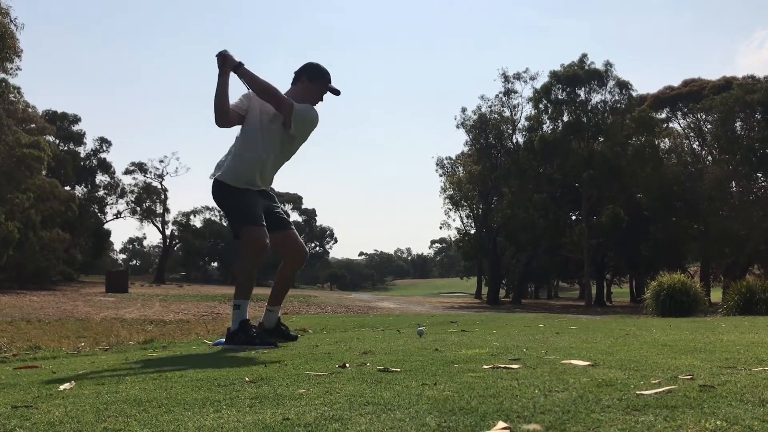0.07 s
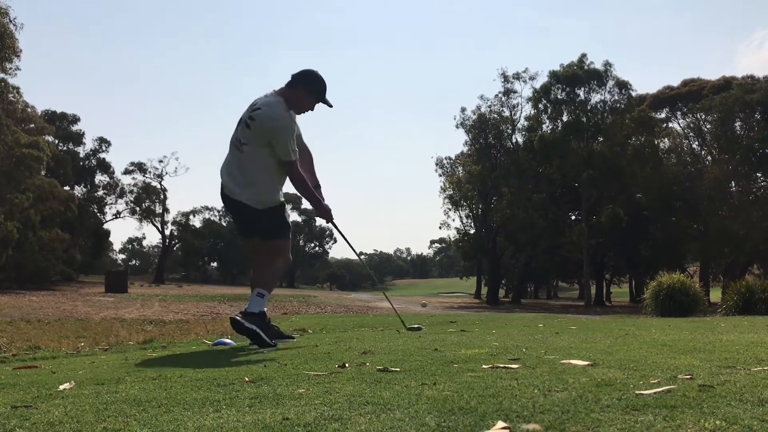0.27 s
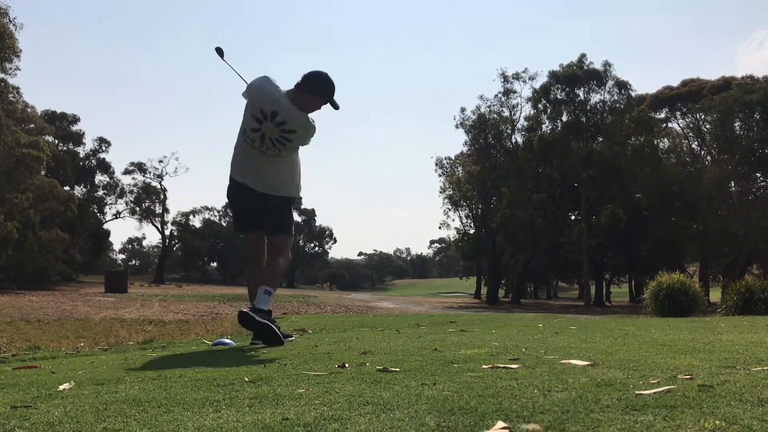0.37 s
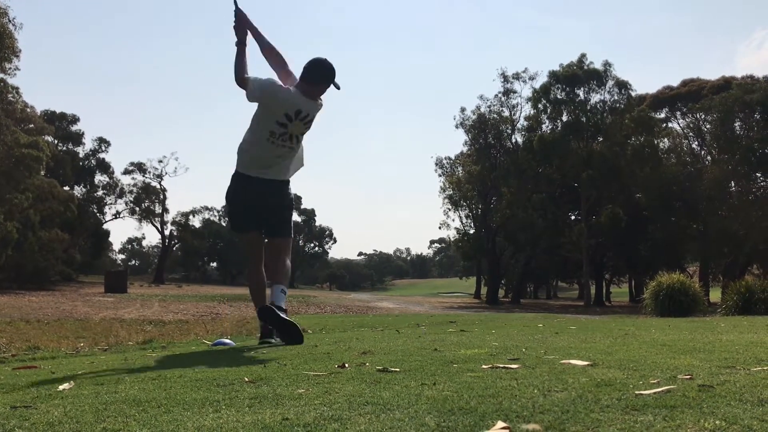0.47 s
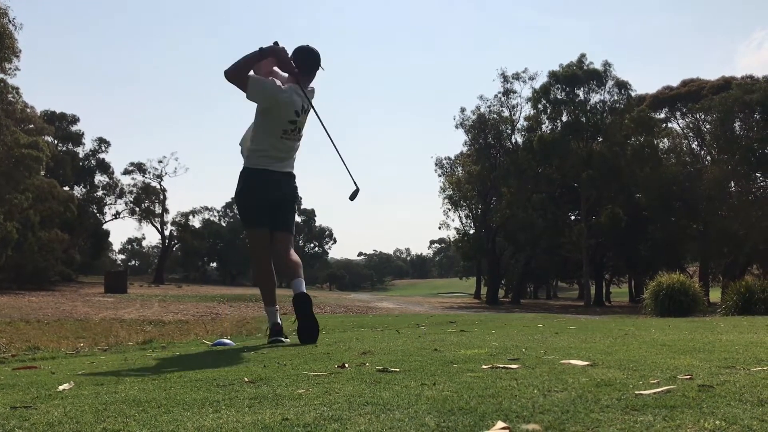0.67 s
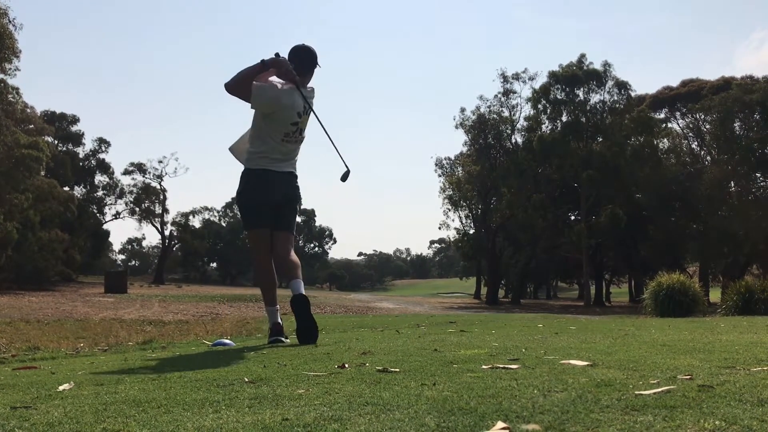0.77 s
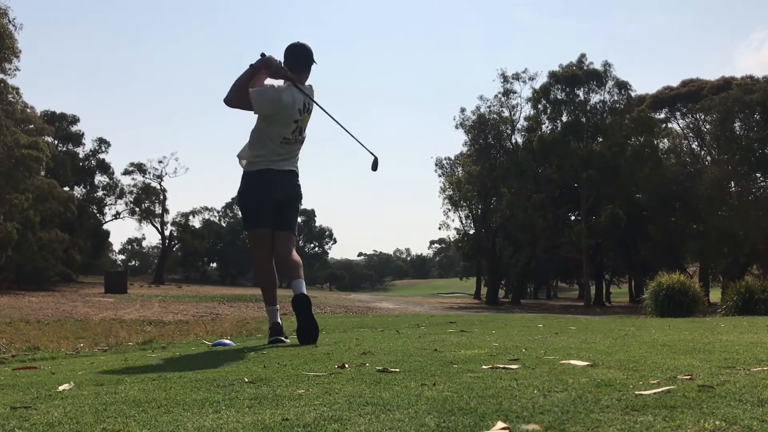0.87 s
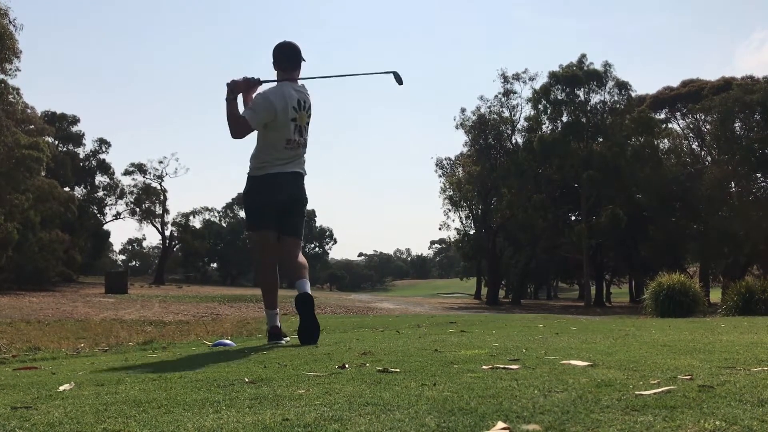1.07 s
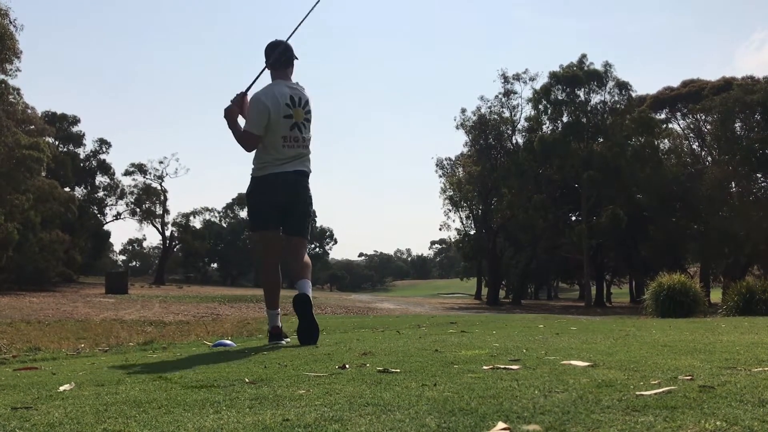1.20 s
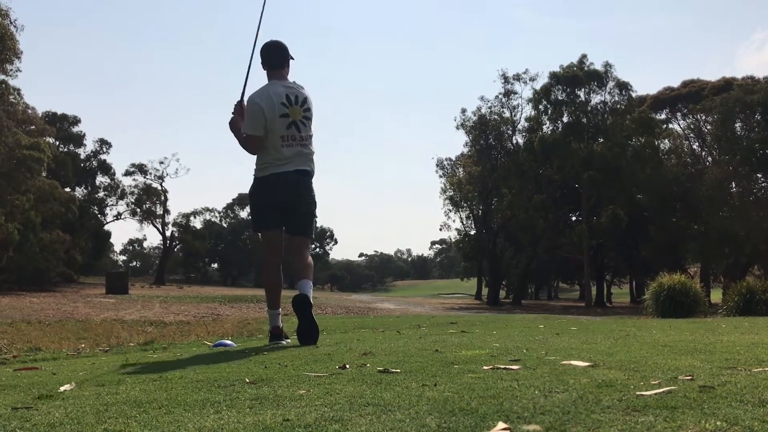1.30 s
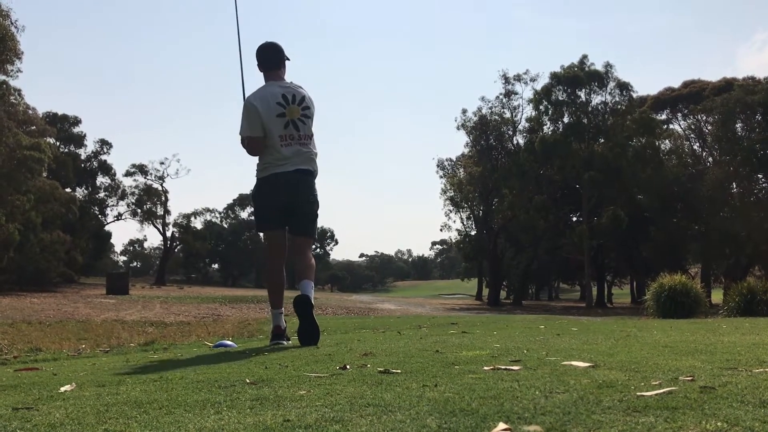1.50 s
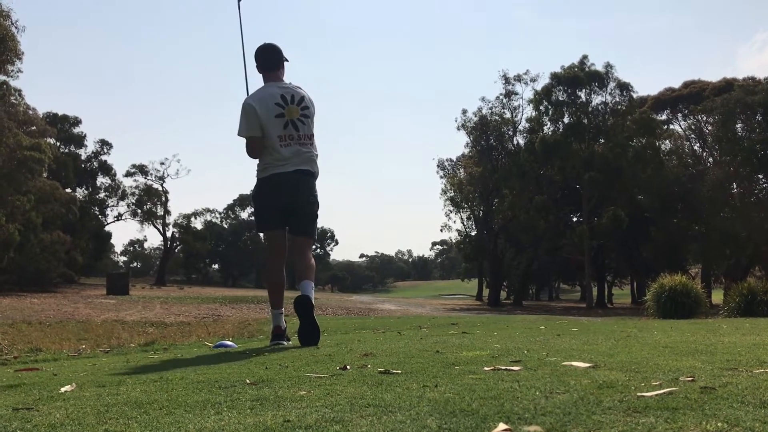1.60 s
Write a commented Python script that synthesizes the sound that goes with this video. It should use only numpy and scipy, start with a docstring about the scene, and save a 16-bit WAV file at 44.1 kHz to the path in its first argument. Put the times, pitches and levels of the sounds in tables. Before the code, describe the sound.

Golf drive outdoors: short club swish, one loud metallic crack, then a hissy echo fading away.

```python
"""A golfer drives a ball off the tee on a quiet, tree-lined course.
An insect (short bursts of high noise) chirps throughout over a low outdoor rumble of shaped noise.
The club swishes down as pitched noise, then its hollow metal head cracks against the ball: a snap,
noise for the crack and the spray of turf, a low knock and briefly ringing modes. Shoes scuff the turf while
two noise echoes return from the trees; a soft tap ends the swing, and a fainter scuff follows later."""
import sys
import numpy as np
from scipy import signal
from scipy.fft import rfft, irfft
from scipy.io import wavfile

SR = 44100
rng = np.random.default_rng(int(sys.argv[2]) if len(sys.argv) > 2 else 0)


def bounce(signal):
    """Save signal as a 16-bit WAV file at the path given by the first command-line argument."""
    frames = np.transpose(np.atleast_2d(signal))
    limited = np.clip(frames, -1, 1)
    pcm = np.round(limited * 32767).astype(np.int16)
    wavfile.write(sys.argv[1], SR, pcm)


N = 72765
TIME = np.arange(N) / SR

# colour shared by the nearer trees' echo and the spray of turf debris: frequency_hz, relative_db
NEAR_TREES = [(300, -12), (1200, -11), (2700, -6), (4600, -6), (5600, 1), (6400, 0), (7400, -2), (8300, -7),
              (12000, -7), (15500, -12)]


def from_db(db):
    """Decibels to amplitude gain."""
    return 10 ** (np.asarray(db) / 20)


def rms_one(x):
    """Scale to unit power."""
    return x / np.sqrt(np.mean(x ** 2) + 1e-20)


def noise(spectrum):
    """Unit-power noise whose colour is drawn between the spectrum's points on a log frequency axis."""
    point_hz, point_db = np.transpose(spectrum)
    bin_hz = np.maximum(np.fft.rfftfreq(N, 1 / SR), 1)
    colour_db = np.interp(np.log(bin_hz), np.log(point_hz), point_db)
    white = rfft(rng.standard_normal(N))
    return rms_one(irfft(white * from_db(colour_db), N))


def wander(rate_hz):
    """Smooth random motion of unit spread: noise low-passed at the given rate."""
    low_pass = signal.butter(2, rate_hz, fs=SR, output="sos")
    return rms_one(signal.sosfilt(low_pass, rng.standard_normal(N)))


def since(start_s):
    """Seconds after a moment, zero before it."""
    return np.maximum(TIME - start_s, 0)


def fade(age, t60_s):
    """Exponential decay that falls 60 dB in t60_s."""
    return np.exp(-np.log(1000) * age / t60_s)


def bump(center_s, width_s):
    """Bell-shaped swell, down to 1/e one width from its centre."""
    return np.exp(-((TIME - center_s) / width_s) ** 2)


def ring(modes, age, glide_per_s=0):
    """Struck modes of alternating sign that build up, flutter and die away, all gliding together."""
    turns = 2 * np.pi * (age + glide_per_s * age ** 2 / 2)  # phase in radians per Hz of mode pitch
    total = np.zeros(N)
    for k, (pitch_hz, level_db, t60_s, rise_s) in enumerate(modes):
        envelope = from_db(level_db) * (1 - np.exp(-age / rise_s)) * fade(age, t60_s)
        flutter = 1 + .22 * wander(300)
        total += (-1) ** k * envelope * flutter * np.sin(pitch_hz * turns)
    return total


def strike():
    """Contact excites a snap, a dense crack, a low knock and the head's modes, and throws up turf."""
    # modes of the club head: starting_pitch_hz, level_db, t60_s, rise_s
    head_modes = [(1968, -13.5, .018, .0018), (2895, -34, .021, .0012), (3235, -29, .022, .0008),
                  (4680, -29, .016, .0006), (5290, -16.5, .015, .0008), (5899, -10.5, .013, .0013),
                  (6390, -8.5, .019, .003), (5951, -38, .29, .003), (6132, -42, .3, .011),
                  (6639, -39.5, .28, .003), (7120, -25, .02, .001), (8290, -24, .035, .0003),
                  (9057, -29.5, .031, .0003), (9768, -25, .017, .0005), (9985, -18.5, .104, .0065),
                  (11580, -20, .042, .0003), (13350, -18.5, .038, .0015), (14051, -20.5, .014, .0003)]
    # dull knock of ball and shaft: pitch_hz, level_before_low_cut_db, t60_s, rise_s
    knock_modes = [(162, -25.5, .046, .004), (270, -28, .02, .001), (630, -15.5, .012, .0006),
                   (960, -14.5, .0065, .0002), (1460, -17.5, .007, .0003)]
    # colour of the crack: frequency_hz, relative_db
    crack_colour = [(200, -13), (700, -3), (1600, -3), (2600, -12), (4300, -13), (5300, -1), (6300, 1),
                    (7700, -1), (9300, -1), (10600, -9), (12200, -3), (13100, 2), (14300, -5), (15300, -19)]
    snap_hz, snap_db, snap_t60_s = 10800, 1, .00052
    crack_db, crack_t60_s = -20.3, .022
    spray_db, spray_t60_s = -46, .2
    knock_low_cut_hz = 110
    ring_rise_per_s = .65  # upward glide, as a fraction of the starting pitch
    turn_after_s, turn_width_s, turn_loss_db = .0265, .0012, -13

    age = since(.2378)
    struck = age > 0
    # first contact
    snap = from_db(snap_db) * fade(age, snap_t60_s) * np.sin(2 * np.pi * snap_hz * age)
    crack = from_db(crack_db) * struck * fade(age, crack_t60_s) * noise(crack_colour)
    # grass and turf debris sprays up after the hit
    spray = from_db(spray_db) * struck * fade(age, spray_t60_s) * noise(NEAR_TREES)
    low_cut = signal.butter(2, knock_low_cut_hz, "high", fs=SR, output="sos")
    knock = signal.sosfilt(low_cut, ring(knock_modes, age) + 1e-18)
    # the ring drops as the face turns away
    turned = (1 + np.tanh((age - turn_after_s) / turn_width_s)) / 2
    head = from_db(turn_loss_db * turned) * ring(head_modes, age, ring_rise_per_s)
    return snap + crack + spray + knock + head


def swish():
    """Eddies shed by the shaft sing at a pitch that follows its speed; the head hisses at its fastest."""
    # the swing: time_s, rush_level_db, eddy_pitch_hz
    swing = [(.11, -78, 360), (.15, -66, 400), (.185, -51, 470), (.215, -48.5, 670), (.24, -53, 750),
             (.285, -66, 640), (.37, -60.5, 680), (.43, -57.5, 690), (.467, -50, 590), (.49, -61, 520),
             (.57, -77, 400)]
    # air tearing past the head: frequency_hz, relative_db
    hiss_colour = [(300, -6), (1200, -1), (2200, -1), (4000, 0), (7000, -2), (10000, -7), (15500, -11)]
    # low push of air from the downswing: frequency_hz, relative_db
    gust_colour = [(50, -25), (110, -4), (170, 0), (280, -7), (500, -25), (2000, -60)]
    eddy_width, overtone_db = .7, -11  # width as a fraction of mean pitch; overtone relative to eddy
    hiss_s, hiss_db, hiss_rise_s, hiss_fall_s = .220, -50, .040, .030
    gust_s, gust_db, gust_width_s = .208, -47, .028

    time_s, rush_db, pitch_hz = np.transpose(swing)
    cycles = np.cumsum(np.interp(TIME, time_s, pitch_hz)) / SR
    blur = signal.butter(2, eddy_width * pitch_hz.mean() / 2, fs=SR, output="sos")

    def eddy_band(harmonic):
        """Slow complex noise shifted up to a harmonic of the eddy pitch."""
        slow = signal.sosfilt(blur, rng.standard_normal(N) + 1j * rng.standard_normal(N))
        return rms_one(np.real(slow * np.exp(2j * np.pi * harmonic * cycles)))

    eddies = eddy_band(1) + from_db(overtone_db) * eddy_band(2)
    swinging = (TIME > time_s[0]) * (TIME < time_s[-1])
    rush = from_db(np.interp(TIME, time_s, rush_db)) * swinging * eddies
    gust = from_db(gust_db) * bump(gust_s, gust_width_s) * noise(gust_colour)
    hiss_width_s = np.where(TIME < hiss_s, hiss_rise_s, hiss_fall_s)
    hiss = from_db(hiss_db) * bump(hiss_s, hiss_width_s) * noise(hiss_colour)
    return rush + gust + hiss


def tree_echo(colour, start_s, level_db, rise_s, t60_s):
    """Leaves and trunks scatter the crack; the longer the path, the more treble the air takes."""
    air_loss_db_per_s = 27  # at 10 kHz, growing with the square of frequency
    age = since(start_s)
    scatter = rfft(noise(colour))
    bin_khz = np.round(np.fft.rfftfreq(N, 1 / SR) / 1000)
    dulled = np.zeros(N)
    for khz in np.unique(bin_khz):  # each 1 kHz band loses level at its own rate
        band = irfft(scatter * (bin_khz == khz), N)
        dulled += band * from_db(-air_loss_db_per_s * (khz / 10) ** 2 * age)
    # clumps of foliage return the sound unevenly
    uneven_gain = from_db(level_db + 1.2 * wander(40))
    return uneven_gain * (1 - np.exp(-age / rise_s)) * fade(age, t60_s) * dulled


def golfer():
    """Shoes brush the grass as swells of noise, and a decaying tone taps softly as the swing ends."""
    # shoes scuff the turf: center_s, level_db, width_s (standard deviation)
    scuffs = [(.326, -52.7, .012), (1.565, -69.3, .06)]
    # colour of shoe on grass: frequency_hz, relative_db
    scuff_colour = [(150, -1), (380, 6), (900, 1), (2000, -1), (3400, -1), (6000, -10), (9000, -22),
                    (15000, -29)]
    tap_s, tap_hz, tap_db, tap_t60_s = .771, 620, -42, .0055

    rubbing = sum(from_db(level_db) * bump(center_s, width_s * np.sqrt(2))
                  for center_s, level_db, width_s in scuffs)
    age = since(tap_s)
    tap = from_db(tap_db) * fade(age, tap_t60_s) * np.sin(2 * np.pi * tap_hz * age)
    return rubbing * noise(scuff_colour) + tap


def insect():
    """Short, high, rasping chirps: bell-shaped bursts of treble noise."""
    # chirps: center_s, level_db, length_s (between the 1/e points)
    chirps = [(.03, -74, .028), (.138, -73, .024), (.635, -74, .026), (.692, -75, .03), (.758, -76, .026),
              (.822, -77, .028), (.888, -79, .028), (.95, -79, .026), (1.024, -77, .028),
              (1.078, -76, .026), (1.188, -75, .026), (1.235, -74, .03), (1.36, -74, .022),
              (1.387, -72, .016), (1.417, -77, .012), (1.522, -73, .014), (1.551, -73, .014),
              (1.577, -76, .012)]
    # colour of a chirp: frequency_hz, relative_db
    chirp_colour = [(8500, -35), (10400, -5), (11600, 0), (12400, -7), (14500, -25)]
    strokes = sum(from_db(level_db) * bump(center_s, length_s / 2)
                  for center_s, level_db, length_s in chirps)
    return strokes * noise(chirp_colour)


def ambience():
    """Steady outdoor noise, heaviest in the bass."""
    # colour of the rumble: frequency_hz, relative_db
    rumble_colour = [(20, -29), (36, -11), (55, 0), (110, -1.5), (170, -5.5), (260, -9.5), (400, -19.5),
                     (700, -27.5), (1500, -31.5), (3600, -33), (6200, -39), (8000, -44), (12000, -42.5),
                     (15500, -47)]
    return from_db(-57) * noise(rumble_colour)


def scene():
    """The drive, its echoes and the course around it."""
    # colour of sound scattered by the farther trees: frequency_hz, relative_db
    far_trees = [(500, -12), (1300, -14), (2800, -10), (3900, -2), (4800, -11), (5850, 2.5), (6500, -6),
                 (7200, -2.5), (9000, -15), (15000, -28)]
    near_echo = tree_echo(NEAR_TREES, start_s=.268, level_db=-45, rise_s=.026, t60_s=1.0)
    far_echo = tree_echo(far_trees, start_s=.474, level_db=-55, rise_s=.004, t60_s=1.0)
    drive = strike() + swish() + near_echo + far_echo
    mono = drive + golfer() + insect() + ambience()
    return mono[None]


def record(dry):
    """The top is cut steeply by an elliptic low-pass."""
    cutoff_hz, ripple_db, rejection_db = 15900, .1, 70
    low_pass = signal.ellip(10, ripple_db, rejection_db, cutoff_hz, fs=SR, output="sos")
    return signal.sosfilt(low_pass, dry)


dry = scene()
out = record(dry)
bounce(out)
```